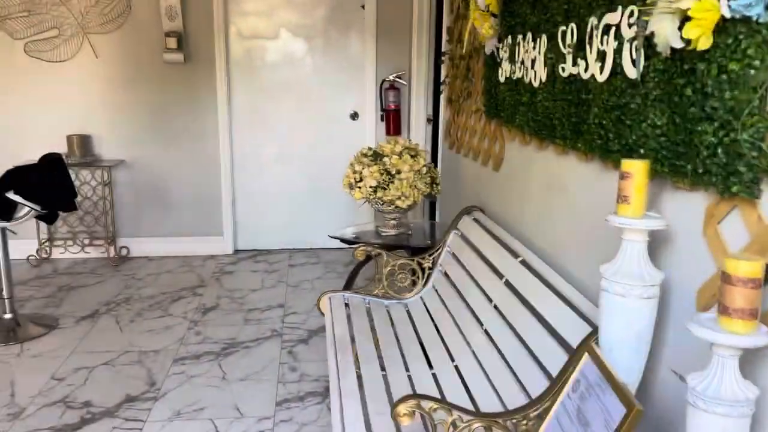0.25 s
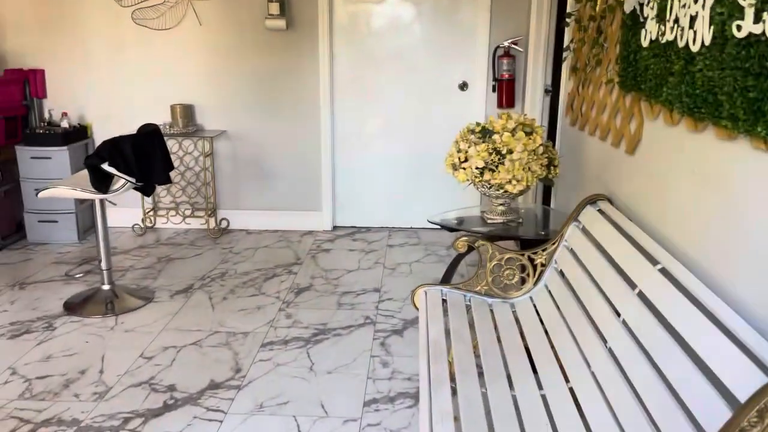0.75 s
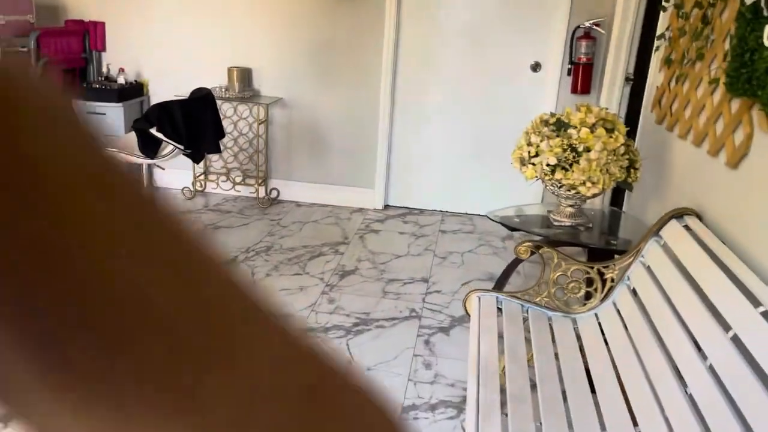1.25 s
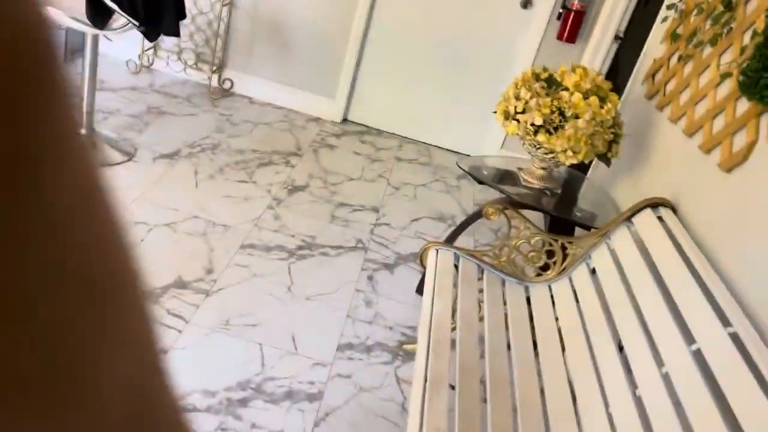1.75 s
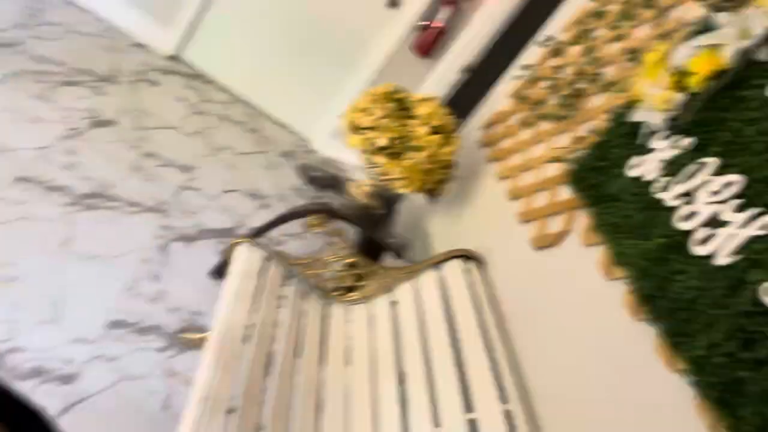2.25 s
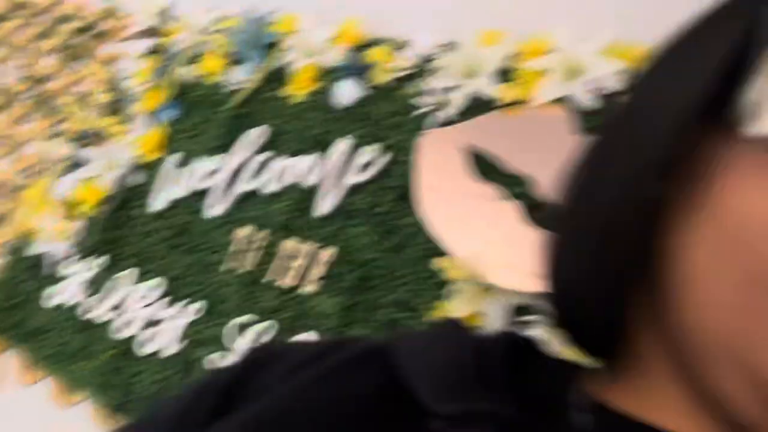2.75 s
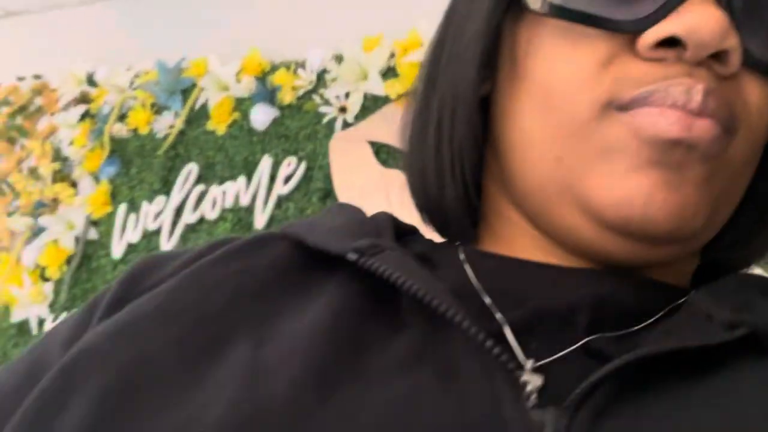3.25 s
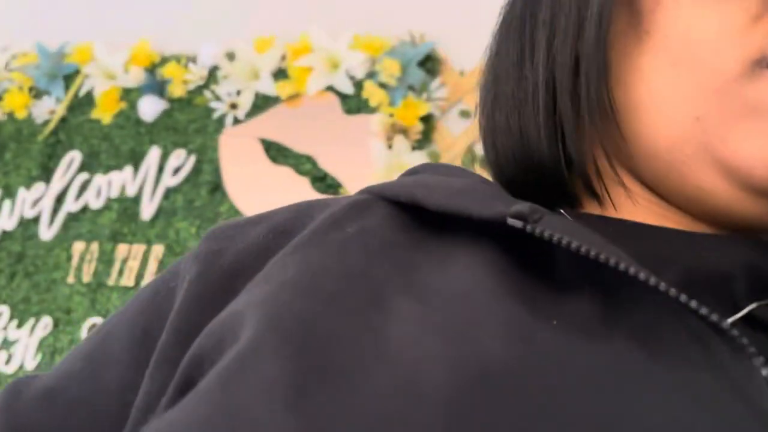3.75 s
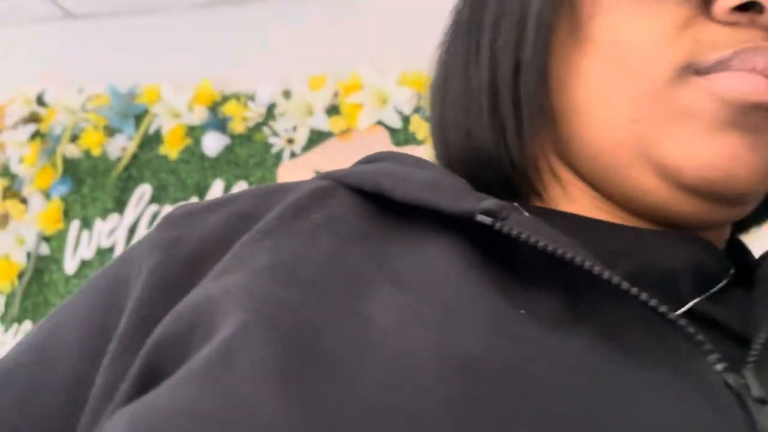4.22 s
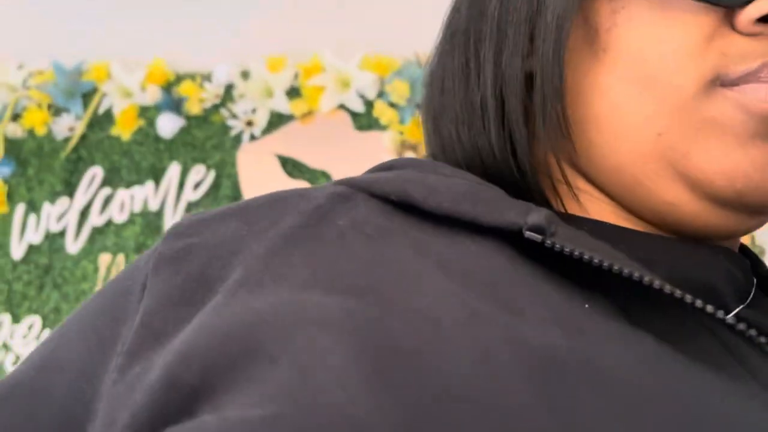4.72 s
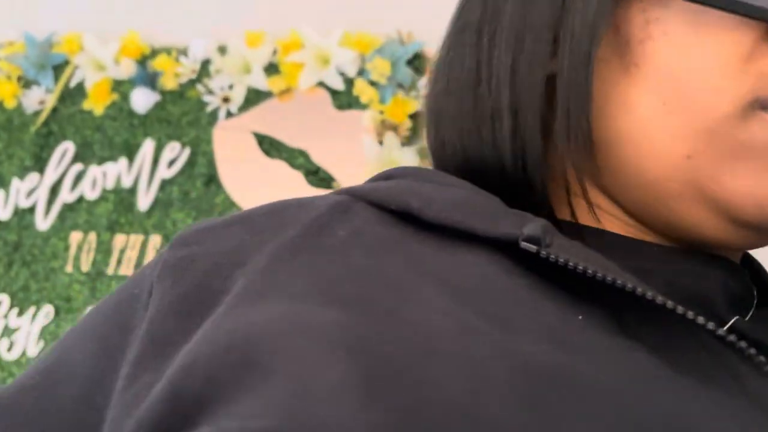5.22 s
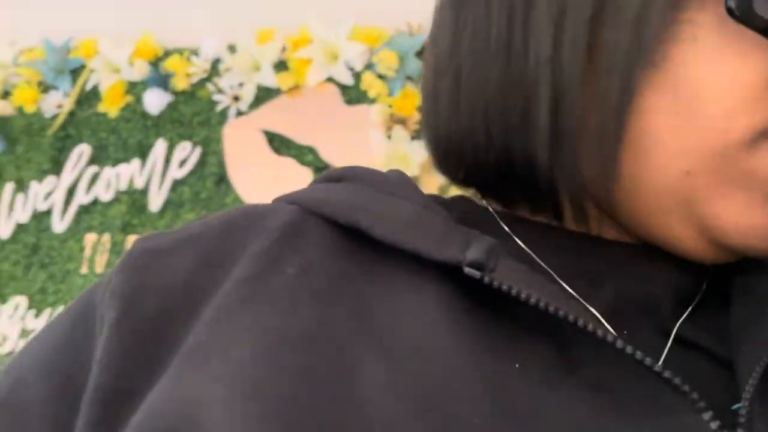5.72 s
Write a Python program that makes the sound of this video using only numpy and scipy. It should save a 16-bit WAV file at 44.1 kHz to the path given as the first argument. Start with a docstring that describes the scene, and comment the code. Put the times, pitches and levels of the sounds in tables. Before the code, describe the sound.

Low thumps and tiny clinks open the scene, with grainy scraping and bright fingertip taps right at the microphone. A door is knocked faintly, then shuts very loudly, its panel ringing and low room boom pulsing as it rocks to rest. Afterwards there is only soft room noise and faint hum, a soft bump with a sharp double snap, and later another.

```python
"""A tiled entrance room, heard from a hand-held phone. Something small clinks and scrapes close by,
sleeves rustle and fingers tick on the case while a door is knocked, catches on its latch and slams.
The leaf rocks and rattles in its frame and the room booms; two sharp double clicks follow.
Struck bodies are decaying sines with coloured noise bursts and a room tail; cloth is grainy noise."""
import sys
import numpy as np
from scipy import signal
from scipy.fft import rfft, irfft, next_fast_len
from scipy.io import wavfile
from scipy.ndimage import uniform_filter1d, minimum_filter1d

SR = 44100
rng = np.random.default_rng(int(sys.argv[2]) if len(sys.argv) > 2 else 0)


def persist_wave(psi):
    """Save psi, clipped to +-1, as 16-bit WAV."""
    counts = np.round(np.clip(psi, -1, 1) * 32767).astype(np.int16)
    wavfile.write(sys.argv[1], SR, np.atleast_2d(counts).T)


N = 263433

# colour of latch and fittings: (frequency [Hz], level [dB])
LATCH_COLOUR = [(150, -4), (400, -5), (900, -6), (1700, -10.5), (2800, -12.5), (4200, -16), (7000, -17.5),
                (11000, -16), (12500, -38.5)]
# the two microphone ports: (frequency [Hz], side against mid [dB], left minus right [dB])
MIC_PORTS = [(61.34, -33.5, -0.66), (128.54, -20, -0.7), (230, -15, -3.5), (380, -10, -5), (720, -2, -3.5),
             (1096, -2, -1.5), (1603, -8, -0.5), (3380, -6.5, -1), (4840, -3, -0.5), (5980, -15, 0),
             (7850, -8, 0), (9330, -30, 0), (10067, -5, -0.5), (13200, -30, 0)]
TIME = np.arange(N) / SR
RING_TIME = TIME[:SR]  # each struck sound gets one second
GRID_HZ = np.geomspace(20, SR / 2, num=1500)
BLOW_RISE_S, RATTLE_RISE_S = 0.0036, 0.0006


def door():
    """Each blow rings the panel's modes and its dense upper resonances; loose fittings rattle too."""
    # blows on the door: (time [s], level [dB], brightness [dB per octave], burst t60 [s])
    blows = [(2.16, -29.5, -5, 0.38), (2.3048, -11.5, -0.7, 0.19), (2.324, -12, 0.3, 0.16),
             (2.336, -23, 0.5, 0.024), (2.351, -20.5, -2, 0.24), (2.608, -41.5, -1, 0.052),
             (2.654, -41, -1.5, 0.09), (2.726, -42, -1, 0.019), (2.843, -48, -1.5, 0.059),
             (2.949, -46, 0, 0.015)]
    # dense upper resonances: (frequency [Hz], level [dB])
    dense = [(60, -8), (120, -7.5), (200, -9), (350, -4.5), (500, -5.5), (750, -3), (1100, -5), (1500, -12),
             (2100, -17.5), (3500, -18), (6000, -27.5), (9000, -29.5), (11500, -26.5), (13000, -48.5)]
    # panel modes: (frequency [Hz], level [dB], t60 [s])
    panel_modes = [(151, -6, .3), (199, 3, .4), (237, 1, .5), (277, 2, .42), (315, -2, .38), (382, -1, .38),
                   (446, -9, .42), (503, -1, .36), (583, -4, .36), (607, -6, .38), (736, -2, .3),
                   (797, -8, .35), (884, -5, .32), (1042, -3, .3), (1157, -9, .35), (1290, -9, .26),
                   (1470, -11, .28), (1641, -8, .26), (2040, -16, .28), (2778, -19, .22), (4297, -20, .33)]
    # latch and fittings rattling: (time [s], level [dB])
    rattles = [(2.147, -35.5), (2.153, -24), (2.436, -44.5), (2.476, -33), (2.503, -42.5), (2.527, -39),
               (2.602, -40.5), (2.648, -45.5)]
    # resonances of the latch: (frequency [Hz], width [Hz], lift [dB])
    latch_peaks = [(510, 30, -0.5), (632.8, 35, 4.5), (821, 10.6, 3.5), (950, 40, 1.5), (2260, 84, 1),
                   (2700, 130, 5), (3830, 130, 5), (4284, 130, 9), (5300, 170, 7), (5895, 37, -4)]
    panel_db = -9

    out = np.zeros((2, N))
    # the panel modes also colour the burst and its echo: wider with pitch, lifted 6 dB
    panel_peaks = [(hz, 8 + .005 * hz, 6) for hz, _, _ in panel_modes]
    leaf = resonant(dense, panel_peaks)
    for s, db, tilt_db, t60 in blows:
        panel = undb(panel_db) * ring(panel_modes, tilt_db) * (1 - fade(BLOW_RISE_S))
        burst = strike(leaf, BLOW_RISE_S, t60, room_db=-7.5, tilt_db=tilt_db)
        add(out, s, undb(db) * (burst + panel))
    latch = resonant(LATCH_COLOUR, latch_peaks)
    for s, db in rattles:
        add(out, s, undb(db) * strike(latch, RATTLE_RISE_S, t60=.125, room_db=-9))
    return out


def boom():
    """Heavy pushes pump the two lowest room modes and a thud; each push checks the swing before it."""
    # pushes on the room's air, the last as the leaf rocks to rest:
    # (time [s], lower mode level [dB], upper mode level [dB])
    pushes = [(.008, -33, -13), (.044, -30.5, -14.5), (1.445, -39, -31.5), (1.976, -47, -39),
              (2.155, -26, -19.5), (2.318, -12, -8), (2.42, -16.5, -22.5), (2.525, -17, -27),
              (2.746, -24, -32.5), (2.885, -30.5, -47), (2.972, -35.5, -47), (3.068, -40, -51),
              (3.161, -48.5, -57)]
    # lowest room modes: (frequency [Hz], t60 [s])
    lowest_modes = [(46.5, 0.67), (76.5, 0.47)]
    # next room modes, a dull thud: (frequency [Hz], level against the upper mode [dB], t60 [s])
    thud_modes = [(95.8, -3, 0.21), (128.8, -13.5, 0.47), (148.9, -14, 0.14)]
    rise_s, check_s = 0.035, 0.025

    out = np.zeros((2, N))
    next_times = [row[0] for row in pushes[1:]] + [np.inf]
    for (s, *levels), next_s in zip(pushes, next_times):
        swing = sum(undb(db) * mode(hz, t60) for db, (hz, t60) in zip(levels, lowest_modes))
        thud = sum(undb(levels[1] + db) * mode(hz, t60) for hz, db, t60 in thud_modes)
        # falls to nothing just before the next push, so the boom comes in lumps
        free = np.sin(np.pi / 2 * np.clip((next_s - s - RING_TIME) / check_s, 0, 1))
        add(out, s, (swing + thud) * (1 - fade(rise_s)) * free)
    return out


def knock():
    """A short crack rings wood and metal together; duller rebounds follow."""
    # the knock and its rebounds: (time [s], level [dB], brightness [dB per octave])
    knocks = [(1.4161, -35.5, -0.5), (1.438, -40.5, -3.5), (1.514, -50.5, -5), (1.539, -48.5, -3.5)]
    # wood and metal ringing: (frequency [Hz], level [dB], t60 [s])
    knock_modes = [(229, 0, .2), (400, -3, .16), (835, -2, .13), (1010, -7, .13), (1490, -11, .12),
                   (1707, -14, .15), (2030, -13, .12), (2440, -14, .12), (2778, -8, .19), (3710, -13, .09),
                   (4060, -14, .12)]
    crack_db = 4

    out = np.zeros((2, N))
    for s, db, tilt_db in knocks:
        crack = strike(LATCH_COLOUR, RATTLE_RISE_S, t60=0.034, room_db=-9.5, tilt_db=tilt_db)
        body = ring(knock_modes, tilt_db) * (1 - fade(BLOW_RISE_S))
        add(out, s, undb(db) * (body + undb(crack_db) * crack))
    return out


def clicks():
    """Hard little double snaps, each briefly ringing two body resonances, answered by the room."""
    # sharp clicks: (time [s], snap level [dB], rise [s], lower resonance [Hz], its level [dB],
    # upper resonance [Hz], its level [dB])
    snaps = [(3.96, -29, 0.05, 600, -37, 718, -48), (3.969, -26.5, 0.009, 951, -33, 2888, -38),
             (5.0768, -31, 0.026, 1845, -40, 2226, -41), (5.079, -29, 0.012, 690, -28, 900, -30)]
    # colour of the snap: (frequency [Hz], level [dB])
    snap_colour = [(40, -7), (150, -8.5), (280, -13), (430, -17.5), (850, -9), (1300, -10), (2000, -15),
                   (2900, -13.5), (4200, -19), (6300, -20.5), (9000, -22), (11000, -11.5), (14000, -75)]
    # narrow resonances in it: (frequency [Hz], width [Hz], lift [dB])
    snap_peaks = [(1540, 49, 7.5), (2530, 160, 4), (3070, 300, 2.5), (3320, 160, 3.5), (5470, 100, 8),
                  (6200, 220, 5), (7760, 700, 8.5)]
    body_t60_s, left_minus_right_db = 0.07, -2

    out = np.zeros((2, N))
    for s, db, rise, low_hz, low_db, high_hz, high_db in snaps:
        # the lower resonance also stands out in the burst and lingers in the room: 80 Hz wide, 12 dB up
        colour = resonant(snap_colour, [*snap_peaks, (low_hz, 80, 12)])
        # the extra fade shortens the room's answer
        snap = strike(colour, rise, t60=.045, room_db=-12) * fade(.55)
        body = ring([(low_hz, low_db, body_t60_s), (high_hz, high_db, body_t60_s)])
        add(out, s, undb(db) * snap + body * (1 - fade(rise)))
    return out * undb(np.array([[1], [-1]]) * left_minus_right_db / 2)


def clatter():
    """Something small, with loose metal on it, clinks as it is jolted and scrapes in grainy strokes."""
    # small metallic clinks: (time [s], level [dB])
    clinks = [(0.0731, -42), (.105, -45.5), (.131, -65)]
    # what they ring with: (frequency [Hz], level [dB], t60 [s])
    clink_modes = [(603, -3, .23), (680, -3, .1), (790, -3, .12), (1010, -7, .13), (2428, -9, .21),
                   (4060, -6, .13), (4382, -14, .21), (5588, -14, .3), (6062, -10, .25), (7364, -12, .3),
                   (7957, -7, .14), (9921, -6, .18), (10610, 0, .26), (10930, -2, .15), (11790, -13, .16),
                   (12390, -13, .16)]
    # scraping strokes: (start [s], length [s], level [dB])
    scrapes = [(0.087, 0.015, -55), (0.163, .11, -58.5), (0.352, 0.051, -62.5), (0.498, 0.095, -63.5)]
    # colour of the scrape: (frequency [Hz], level [dB])
    scrape_colour = [(500, -20), (1200, -3.5), (2600, -11.5), (4200, -10), (7000, -20)]
    # narrow resonances in it: (frequency [Hz], width [Hz], lift [dB])
    scrape_peaks = [(797, 40, 17.5), (1880, 30, 8), (2090, 79, 5.5), (2620, 270, 12), (4030, 50, 1)]
    attack_s, fall_db_per_s = 0.0068, 213

    strokes = sum(undb(db) * gesture(s, length, attack_s, fall_db_per_s) for s, length, db in scrapes)
    out = noise(resonant(scrape_colour, scrape_peaks), N) * strokes * catches()
    for s, db in clinks:
        add(out, s, undb(db) * ring(clink_modes) * (1 - fade(BLOW_RISE_S)))
    return out


def tapping():
    """Bright ticks right at the phone, almost dry, and soft banded taps and bumps, among them footsteps and a
    low thump under the first click; longer taps start more softly."""
    # dry, bright ticks: (time [s], level [dB], top [Hz])
    ticks = [(0.586, -42, 12000), (0.632, -37, 11500), (.695, -27.5, 11700), (0.876, -45, 12500),
             (1.04, -51, 12000), (1.109, -28.5, 14500), (1.353, -38, 13000), (1.539, -25.5, 14500),
             (1.622, -37, 14000), (1.635, -34, 14000), (1.804, -40, 11800), (2.326, -28, 12500),
             (2.55, -23, 13300), (4.424, -42, 12000)]
    # colour of a tick: (frequency [Hz], level [dB])
    tick_colour = [(1500, -24), (4000, -16.5), (7500, -7.5), (10700, 3), (12000, -7.5), (15000, -20)]
    # soft taps and bumps, including heel steps and the low thump under the first click: (time [s], level [dB],
    # centre [Hz], half width [octaves], t60 [s])
    taps = [(.009, -41.5, 620, 1.1, 0.18), (0.011, -49, 3020, 0.42, 0.2), (0.044, -40.5, 3140, 0.64, 0.016),
            (.073, -42, 830, 0.36, 0.063), (0.583, -36.5, 630, 0.57, 0.053), (.634, -45, 990, 0.33, 0.04),
            (0.678, -54, 1400, 0.95, 0.086), (.698, -37.5, 720, 0.4, 0.032),
            (0.877, -42, 1510, 0.14, 0.024), (0.877, -53, 2820, 0.16, 0.022),
            (0.878, -54, 452, 0.27, 0.065), (0.899, -49.5, 1900, .6, 0.039),
            (1.211, -45.5, 950, 0.59, 0.025), (1.216, -43, 227, 0.85, 0.2), (1.231, -51, 1210, 0.34, 0.037),
            (1.273, -53, 900, 0.49, 0.077), (1.355, -53.5, 1200, 0.72, 0.036),
            (1.541, -54, 2740, 0.16, 0.009), (1.595, -49, 1830, 0.37, 0.034),
            (1.8037, -40.5, 1770, 0.28, 0.017), (1.806, -36.5, 720, 0.39, 0.023),
            (1.871, -48.5, 824, 0.66, 0.11), (1.922, -49, 1140, 0.14, 0.11), (1.973, -45, 600, 0.63, 0.17),
            (2.109, -52, 730, 0.5, 0.028), (3.918, -50, 490, 0.91, 0.1), (3.939, -33.5, 370, 0.9, 0.059),
            (3.972, -47, 220, 0.76, 0.31), (4.199, -49, 465, 1.34, 0.026), (4.219, -50.5, 290, 1.3, 0.05),
            (5.03, -74.5, 2500, 0.21, 0.043)]
    tick_t60_s = .009

    out = np.zeros((2, N))
    room = undb(-34) * fade(.35)  # faint tail under the taps; the ticks get half of it
    for s, db, top_hz in ticks:
        colour = np.column_stack([GRID_HZ, along(GRID_HZ, tick_colour)])[GRID_HZ < top_hz]
        envelope = (fade(tick_t60_s) + room / 2) * (1 - fade(tick_t60_s / 2))
        add(out, s, undb(db) * noise(colour, SR) * envelope)
    for s, db, hz, octaves, t60 in taps:
        hump_db = -10 * np.log10(1 + (np.log2(GRID_HZ / hz) / octaves) ** 6)
        hump = np.column_stack([GRID_HZ, hump_db])[GRID_HZ < 13000]
        envelope = (fade(t60) + room) * (1 - fade(.08 * t60))
        add(out, s, undb(db) * noise(hump, SR) * envelope)
    return out


def sleeve():
    """Cloth rubs and hisses in small catches as the arm moves; the hand rumbles evenly on the case."""
    # dull rubs of the sleeve: (time [s], level [dB])
    rubs = [(.06, -54), (0.599, -57.5), (0.689, -69), (.92, -63), (1.214, -57.5), (1.299, -64.5),
            (1.46, -71.5), (1.876, -61.5), (1.972, -65.5), (3.7, -64.5)]
    # cloth sliding on cloth: (start [s], length [s], level [dB])
    swishes = [(.03, 0.095, -50), (.58, 0.062, -59), (.697, 0.0098, -47.5), (.87, 0.02, -55.5),
               (1.215, 0.054, -60.5), (1.57, 0.02, -57.5), (1.87, 0.14, -57.5), (2.62, 0.44, -66),
               (3.842, 0.019, -63)]
    # colours of rub, swish and hand rumble: (frequency [Hz], level [dB])
    rub_colour = [(150, -15.5), (300, 2.5), (600, 10.5), (1200, 3.5), (1900, -10.5), (2800, -9.5),
                  (5000, -28), (9000, -33.5)]
    cloth_colour = [(1500, -0.5), (2700, -2.5), (5000, -4.5), (7000, -3), (9000, -1), (11200, -1.5),
                    (12300, -28.5)]
    rumble_colour = [(30, -16), (45, -7.5), (90, 2.5), (140, -8), (220, -11.5), (400, -19)]
    rub_attack_s, rub_fall_db_per_s = 0.069, 36.5
    swish_attack_share, swish_fall_db_per_s = 0.33, 136  # a swish swells over this share of its length
    walk_ends_s, rumble_db, rumble_fall_db_per_s = 3.09, -52.5, 33  # it fades once the walking stops
    creep = (0, 0.88, -69.5)  # faint sliding under the swishes: (start [s], length [s], level [dB])

    rubbing = sum(undb(db) * gesture(s, rub_attack_s, rub_attack_s, rub_fall_db_per_s) for s, db in rubs)
    sliding = 0
    for s, length, db in [*swishes, creep]:
        sliding = sliding + undb(db) * gesture(s, length, swish_attack_share * length, swish_fall_db_per_s)
    rub = noise(rub_colour, N) * rubbing * catches()
    hiss = noise(cloth_colour, N) * sliding * catches()
    holding = gesture(0, walk_ends_s, rub_attack_s, rumble_fall_db_per_s)
    return rub + hiss + noise(rumble_colour, N) * undb(rumble_db) * holding


def hum():
    """Steady faint tones of the room whose level and phase waver slowly."""
    # (frequency [Hz], mean level [dB])
    tones = [(97, -74), (183, -78.5)]
    return sum(undb(db + 2 * walk(3)) * np.sin(2 * np.pi * hz * TIME + walk(5)) for hz, db in tones)


def room_floor():
    """The quiet room: coloured noise whose level wanders by about a decibel."""
    # (frequency [Hz], level [dB])
    floor_colour = [(25, -12), (55, 0), (90, -2), (180, -3), (430, -12), (1000, -18), (1600, -24),
                    (5000, -32), (11000, -30), (12000, -42)]
    return noise(floor_colour, N) * undb(-69 + walk(6))


def strike(spectrum, rise, t60, room_db, tilt_db=0):
    """A short burst, then the room's tail, which builds up quickly and dies soonest in the treble."""
    # decay of the room: (frequency [Hz], t60 [s])
    room_t60 = [(100, 0.8), (400, 0.54), (1000, 0.55), (3000, 0.52), (7000, 0.43), (12000, 0.27)]
    burst = noise(spectrum, SR, tilt_db) * fade(t60)
    diffuse = rfft(noise(spectrum, SR, tilt_db))
    centres, t60s = np.transpose(room_t60)
    log_hz = np.log(np.arange(diffuse.shape[1]) + 1)
    tail = 0
    # overlapping bands, each with its own decay
    for band, band_t60 in zip(np.eye(len(t60s)), t60s):
        weight = np.interp(log_hz, np.log(centres), band)
        tail = tail + irfft(diffuse * weight) * fade(band_t60)
    return (burst + undb(room_db) * tail * (1 - fade(0.004))) * (1 - fade(rise))


def ring(modes, tilt_db=0):
    """A struck body's modes, tilted by the contact's hardness, each in its own phase at each port."""
    modes_apart_hz = 900  # from here up a mode's phase differs most between the ports
    out = 0
    for (hz, db, t60), (phase, skew) in zip(modes, rng.uniform(-np.pi, np.pi, (len(modes), 2))):
        phases = phase + np.array([[1], [-1]]) * skew * min(hz / modes_apart_hz, 1) / 4
        out = out + undb(db + tilt_db * np.log2(hz / 700)) * mode(hz, t60, phases)
    return out


def mode(hz, t60, phase=0):
    """One struck resonance: a decaying sine."""
    return np.sin(2 * np.pi * hz * RING_TIME + phase) * fade(t60)


def fade(t60):
    """Exponential decay, 60 dB down after t60."""
    return np.exp(-np.log(1000) * RING_TIME / np.maximum(t60, 1 / SR))


def noise(spectrum, size, tilt_db=0):
    """Coloured stereo noise of rms 1, partly alike at both ports, steeply cut above its last point."""
    length = next_fast_len(size, True)
    hz = np.fft.rfftfreq(length, 1 / SR)
    mid, side = rfft(rng.standard_normal((2, length)))
    apart = undb(along(hz, MIC_PORTS))
    edge = np.maximum(hz / spectrum[-1][0], 1) ** -18
    colour = undb(along(hz, spectrum) + tilt_db * np.log2(hz + 1))
    gain = colour * edge * (hz > 20) / np.hypot(1, apart)
    x = irfft(gain * (mid + np.outer([1, -1], apart * side)), length)[:, :size]
    return x / x.std()


def resonant(spectrum, peaks):
    """A smooth spectrum with narrow resonances standing on it."""
    lift = sum((undb(2 * db) - 1) / (1 + (2 * (GRID_HZ - hz) / width) ** 2) for hz, width, db in peaks)
    level_db = along(GRID_HZ, spectrum) + 10 * np.log10(np.maximum(1 + lift, .1))
    return np.column_stack([GRID_HZ, level_db])[GRID_HZ <= spectrum[-1][0]]


def gesture(s, hold, attack, fall_db_per_s):
    """Envelope of one movement: it swells from time s, holds, then dies away."""
    age = TIME - s
    return np.clip(age / attack, 0, 1) * undb(-fall_db_per_s * np.maximum(age - hold, 0))


def catches():
    """Grainy modulation of rms 1: fibres catch and let go at random over a smooth slide."""
    catches_per_s, catch_s, spread_db, smooth_share = 220, .003, 2.2, 0.6
    chance, size = rng.random(N), rng.exponential(size=N)
    jerks = (chance < catches_per_s / SR) * undb(spread_db * np.minimum(size, 4))
    grains = signal.lfilter([1], [1, -np.exp(-1 / (catch_s * SR))], jerks)
    grains = uniform_filter1d(grains, size=40)
    return np.sqrt(smooth_share + (1 - smooth_share) * grains ** 2 / np.mean(grains ** 2))


def walk(rate):
    """A smooth random wander of spread near 1, with rate new targets a second."""
    steps = rng.standard_normal(N // 100)
    return np.interp(TIME * rate, np.arange(len(steps)), steps)


def undb(db):
    """Decibels to gain."""
    return 10 ** (np.asarray(db) / 20)


def along(hz, table, axis=1):
    """One column of a table, read on a log-frequency axis."""
    rows = np.array(table, float)
    return np.interp(np.log(hz + 1), np.log(rows[:, 0]), rows[:, axis])


def add(out, s, sound):
    """Mix a sound in at time s."""
    start = max(int(s * SR), 0)
    out[:, start:start + sound.shape[-1]] += sound[..., :N - start]


def scene():
    """Door, clicks and handling over the quiet room and its wavering hum."""
    return door() + boom() + knock() + clicks() + clatter() + tapping() + sleeve() + hum() + room_floor()


def record(dry):
    """The two ports differ in phase and level; peaks are held down, deepest bass and top are cut."""
    # phase by which the right port lags: (frequency [Hz], lag [rad])
    port_lag = [(0, 0), (380, 0), (750, 2.2), (1300, 0), (4000, .7), (5800, 6.28), (6200, 6.3),
                (8500, 9.35), (9500, 9.45), (11900, 12.57)]
    length = next_fast_len(N + SR // 10, True)
    hz = np.fft.rfftfreq(length, 1 / SR)
    # half of each difference goes to the left port, its inverse to the right
    half_lag = np.exp(.5j * np.interp(hz, *np.transpose(port_lag)))
    half = half_lag * undb(along(hz, MIC_PORTS, axis=2) / 2)
    heard = irfft(rfft(dry, length) * np.array([half, 1 / half]), length)[:, :N]
    heard = signal.sosfilt(signal.butter(8, 37, "high", fs=SR, output="sos"), heard)
    # a look-ahead limiter turns both channels down for a few ms around each peak
    gain = np.minimum(1, .88 / (np.abs(heard).max(axis=0) + 1e-9))
    gain = uniform_filter1d(minimum_filter1d(gain, size=201), size=201)
    top_cut = signal.ellip(8, .2, 70, 15500, fs=SR, output="sos")
    return signal.sosfilt(top_cut, heard * gain)


dry = scene()
out = record(dry)
persist_wave(out)
```